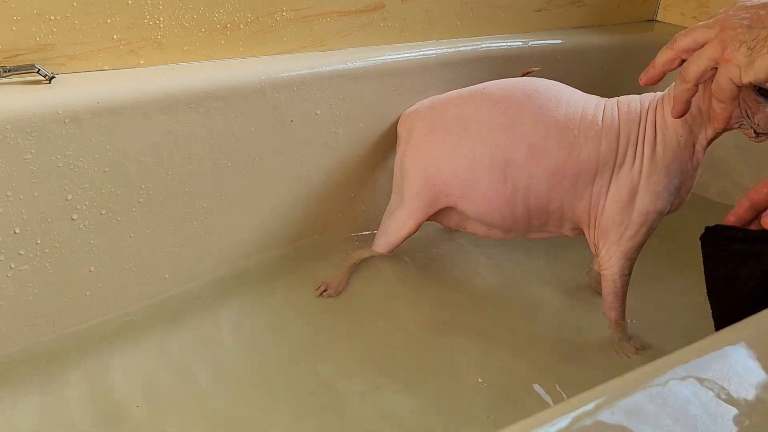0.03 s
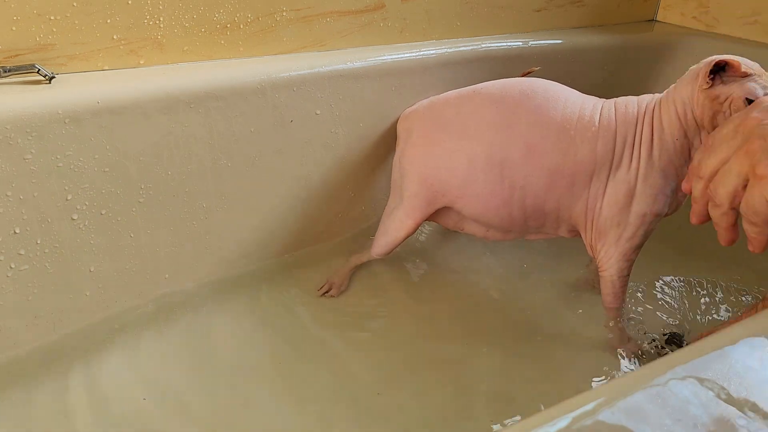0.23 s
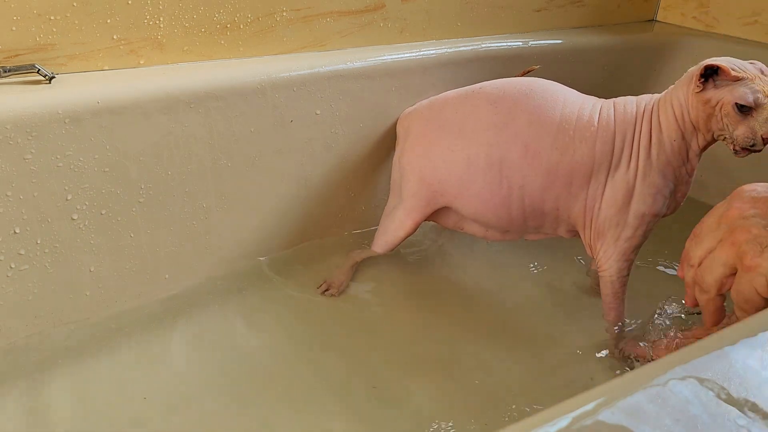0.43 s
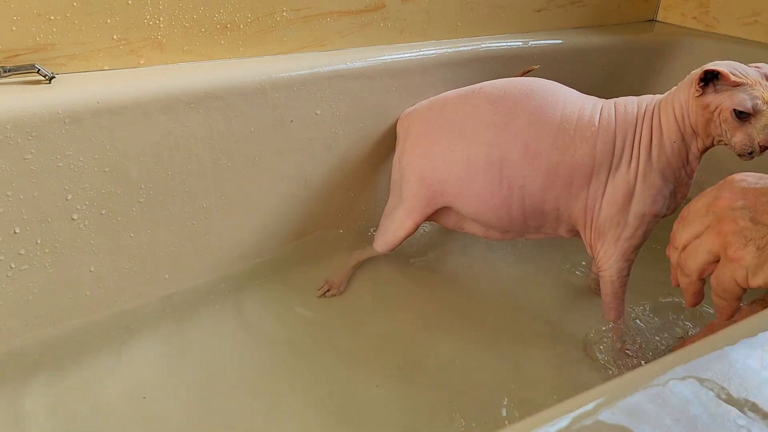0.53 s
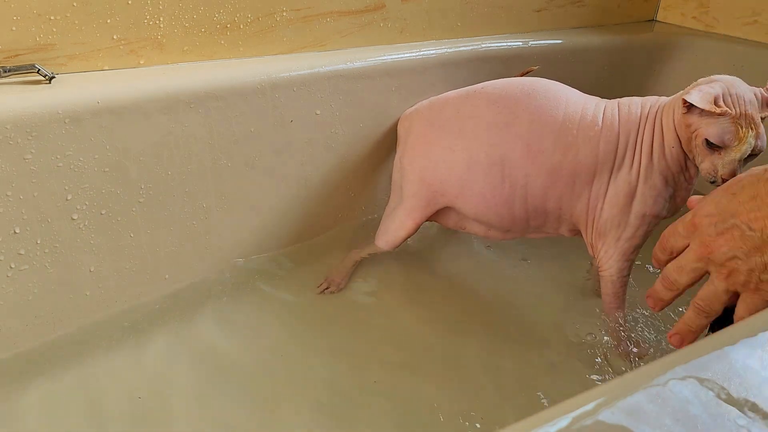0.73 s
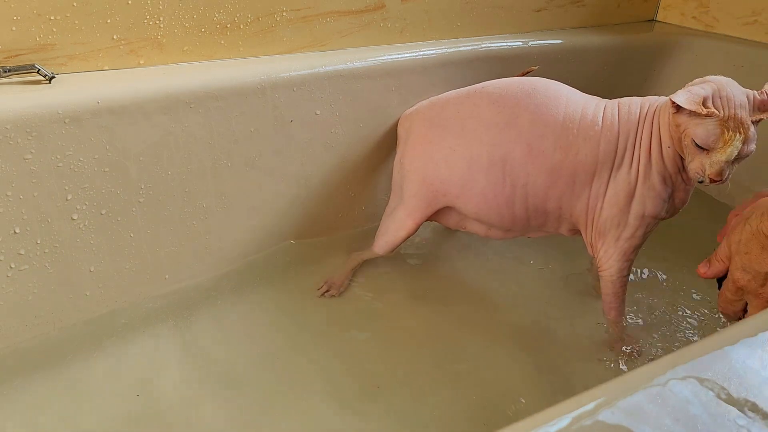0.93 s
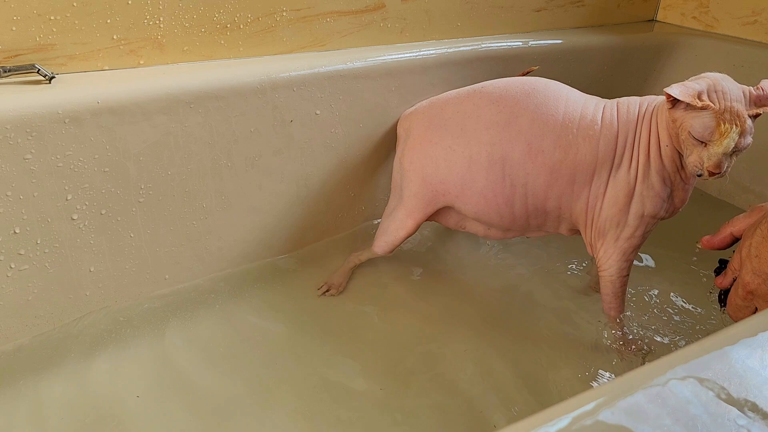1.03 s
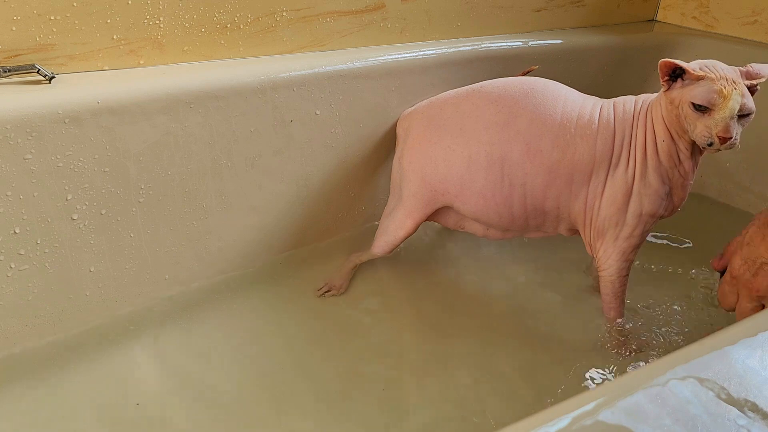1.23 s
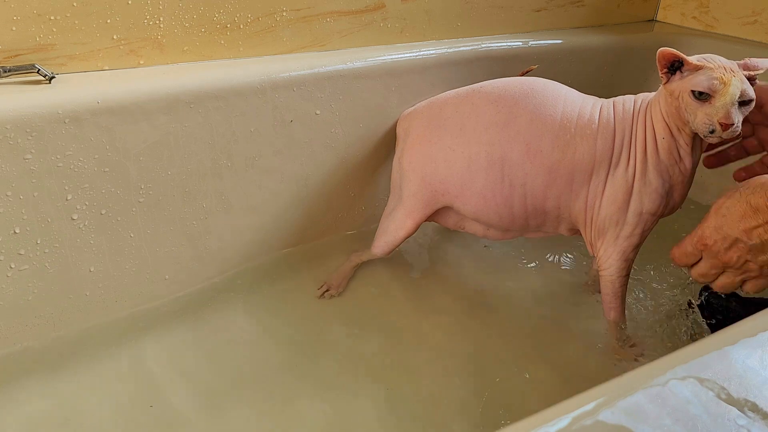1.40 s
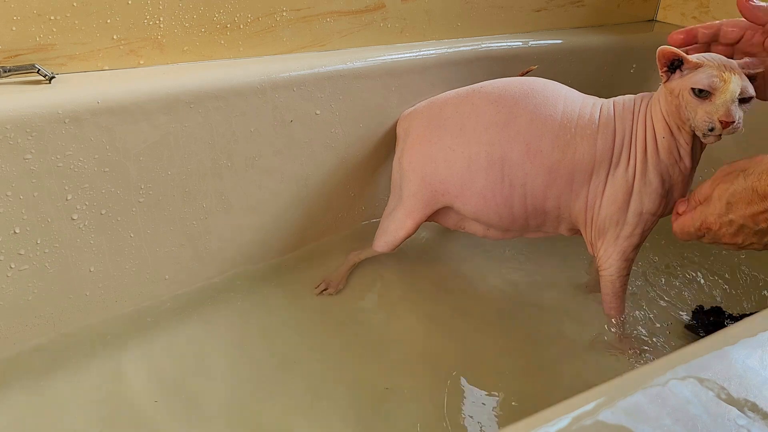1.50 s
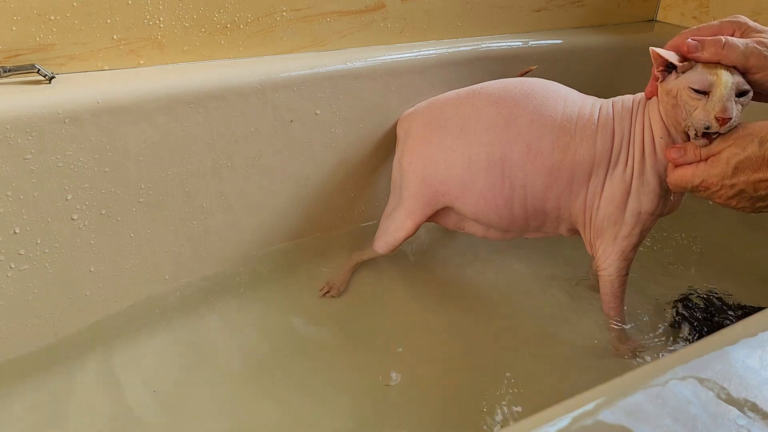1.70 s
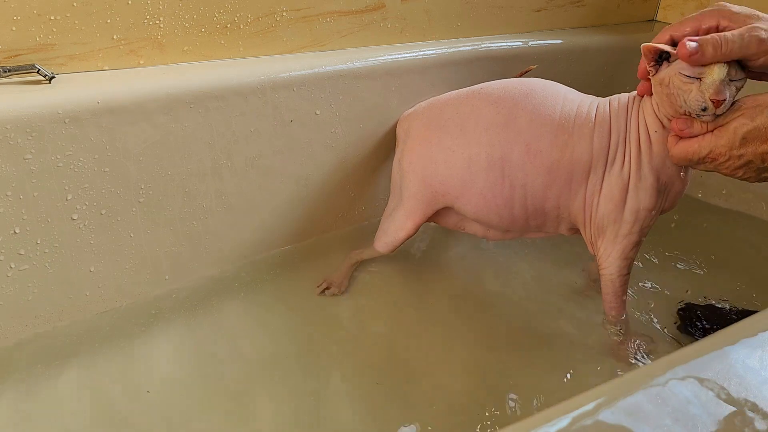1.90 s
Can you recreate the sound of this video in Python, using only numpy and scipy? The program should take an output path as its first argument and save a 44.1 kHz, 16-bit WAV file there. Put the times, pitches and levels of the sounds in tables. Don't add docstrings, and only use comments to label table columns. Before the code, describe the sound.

Shallow water sloshes in a bathtub, beginning with light splashes, growing into bubbly plops and a low gurgle, then sharper splashes before settling. Close stereo microphone in a small reverberant bathroom, faint low room rumble beneath.

```python
import sys
import numpy as np
from scipy import signal
from scipy.fft import rfft, irfft
from scipy.io import wavfile

SR = 44100
rng = np.random.default_rng(int(sys.argv[2]) if len(sys.argv) > 2 else 0)


def volts_from_decibels(level):
    exponent = np.asarray(level, float) / 20
    return 10 ** exponent


def to_wav(s):
    ch = np.atleast_2d(s).T
    pcm = np.round(np.clip(ch, -1, 1) * 32767)
    wavfile.write(sys.argv[1], SR, pcm.astype(np.int16))


N = 85995

# f/Hz, level/dB per Hz
HOUSE_NOISE = [(42, -4.5), (120, -8), (200, -28), (400, -22), (1000, -41), (2200, -28), (5000, -35),
               (16000, -49)]
# t/s, level/dB, f/Hz
TUB_HUM = [(.05, -66, 90.4), (0.107, -44.5, 93.1), (.16, -66, 85.7), (.215, -52, 131.9), (.3, -60.5, 90.4),
           (0.518, -52, 89.5), (0.621, -44.5, 146.4), (0.724, -37.5, 132.3), (0.821, -65, 104.1),
           (1.401, -70, 88.6), (1.469, -47.5, 160.4), (1.56, -71, 88.5)]
# t/s, level/dB, centre f/Hz, width/octaves, length/s
SPLASH_EVENTS = [(.003, -33, 6700, 4.8, 0.0014), (.003, -43.5, 390, 0.82, 0.012),
                 (0.104, -41, 9200, 1.05, 0.032), (0.113, -48.5, 740, 1.45, 0.031),
                 (0.2, -30, 12600, 0.73, 0.0098), (0.211, -25.5, 1140, 2.74, 0.0034),
                 (.213, -32, 890, 1.3, 0.0035), (0.364, -34, 4260, 7.8, 0.028),
                 (0.385, -34.5, 3300, 0.91, 0.011), (0.445, -36, 1280, 0.72, 0.023),
                 (0.494, -33, 1770, 0.91, 0.008), (0.423, -37, 360, 0.94, 0.045),
                 (0.501, -35, 500, 0.98, 0.039), (0.598, -33.5, 4240, 0.51, 0.01),
                 (0.658, -43.5, 716, 0.39, 0.08), (0.69, -36, 5140, 1.2, 0.011),
                 (0.945, -35.5, 7260, 2.4, 0.031), (1.003, -35.5, 11100, 3.3, 0.05),
                 (1.011, -46, 507, 0.89, 0.057), (1.22, -31, 7550, 0.52, 0.007),
                 (1.224, -28.5, 6900, 3.5, 0.024), (1.236, -28.5, 6230, 1, 0.0063),
                 (1.386, -19, 12730, 0.55, 0.011), (1.39, -22.5, 6800, 1.35, 0.0049),
                 (1.452, -24.5, 610, 0.79, 0.0057), (1.469, -25.5, 1400, 1.7, 0.0033),
                 (1.5, -40.5, 298, 0.48, 0.057)]
# t/s, level/dB, f/Hz
DROPLET_TICKS = [(.004, -55, 14300), (.323, -33.5, 13100), (.412, -38, 14500), (0.542, -31, 13200),
                 (0.568, -33, 11400), (0.774, -43, 14400), (0.549, -35, 4620), (0.794, -42, 6300),
                 (.87, -41, 5440), (.928, -40, 8700), (.932, -37, 5900), (0.942, -37, 13900),
                 (.964, -42, 6000), (0.968, -35, 7700), (0.98, -35, 7400), (1.027, -38, 5900),
                 (1.073, -32.5, 4600), (1.127, -37, 7600), (1.195, -35, 5230), (1.252, -38, 5900),
                 (1.046, -36, 7500), (1.177, -33, 13400), (1.665, -35.5, 7460), (1.66, -48, 14300),
                 (1.709, -51, 10100), (1.878, -54, 13240)]
# t/s, level/dB
AGITATION = [(0.0, -92), (0.087, -55.5), (0.292, -49.5), (0.444, -48), (0.564, -35.5), (0.754, -43),
             (0.994, -46), (1.14, -37), (1.39, -38.5), (1.475, -35), (1.852, -62.5), (1.95, -103)]
# t/s, level/dB, f/Hz, left-right level/dB
LOW_BLIPS = [(0.674, -23.5, 321, 3), (0.687, -24, 359, 5), (0.698, -25.5, 384.4, 9),
             (0.709, -21, 405, 9), (0.735, -22.5, 393, -7), (0.746, -27.5, 383, 12),
             (0.764, -30, 414, 5), (0.777, -22, 414, 12.5), (0.797, -19.5, 412, -2.5),
             (0.809, -28.5, 381, 13), (0.837, -23.5, 399, 2), (0.867, -27.5, 378, -0.5),
             (0.885, -31.5, 385, 6), (0.902, -39, 402, -2), (0.93, -46, 415, -10),
             (0.961, -40.5, 424, -1), (1.499, -27, 446, 13), (1.517, -35, 490, 1),
             (1.543, -43, 486, 0.5), (0.444, -36.5, 320, 14), (0.488, -31, 301, -2),
             (0.565, -27.5, 290, 0.5), (0.59, -32.5, 280, 6), (0.211, -37.5, 186, 3.5),
             (0.271, -46, 183, 0.5), (0.39, -41, 212, 2), (0.534, -38, 190, 0.5),
             (1.49, -32.5, 315, 4)]
# t/s, level/dB, f/Hz
BIG_BUBBLES = [
    (0.349, -34, 611),
    (0.509, -19, 441),
    (0.545, -29.5, 472),
    (0.62, -32, 408),
    (1.4501, -19.5, 484),
]
MEDIUM_BUBBLES = [(0.677, -32, 990), (1.018, -33.5, 960), (1.14, -32, 1080), (1.224, -29.5, 955),
                  (1.25, -36, 910), (1.285, -33.5, 924), (1.27, -38.5, 690), (1.335, -45, 794),
                  (1.478, -28.5, 690), (0.52, -28, 672), (0.641, -29, 1316), (1.583, -27.5, 800)]
SMALL_BUBBLES = [(0.4888, -25.5, 1248), (0.49, -24, 1510), (0.494, -24.5, 1223), (0.51, -26.5, 1307),
                 (0.524, -30.5, 1520), (0.61, -30.5, 1530), (0.6, -23, 1443), (0.875, -31.5, 1556),
                 (0.89, -48, 1590), (0.935, -31.5, 1494), (0.9559, -32.5, 1420), (1.0369, -33, 1670),
                 (1.07, -36.5, 1610)]
SMALLER_BUBBLES = [(0.462, -32.5, 1850), (0.49, -31, 2740), (0.5648, -25.5, 2296), (0.568, -20.5, 2280),
                   (0.655, -27, 1935), (0.9798, -32.5, 1930), (1.1715, -26.5, 1997), (1.18, -29, 2280),
                   (1.19, -30, 1910), (1.203, -28, 2204), (1.222, -32.5, 2030), (1.2999, -37, 2200),
                   (1.3875, -28.5, 2060), (1.397, -28, 2010), (1.407, -34, 2070), (1.415, -37, 2100),
                   (1.4534, -28.5, 2050), (1.4696, -23.5, 2157), (1.475, -23, 2284), (1.493, -42, 2080),
                   (1.757, -44, 2100), (1.774, -41, 2220), (1.797, -40, 2145), (1.83, -42, 2080),
                   (1.87, -58, 2150)]
TINY_BUBBLES = [
    (0.387, -32.5, 2596),
    (0.841, -38.5, 3160),
    (0.852, -32.5, 3550),
    (0.86, -35.5, 3180),
    (1.0241, -34.5, 3610),
    (1.0653, -27.5, 3320),
    (1.074, -30, 3550),
    (1.086, -32, 3170),
    (1.105, -34.5, 3490),
    (1.511, -37, 4430),
]
# f/Hz, level/dB
TUB_TONE = [(400, 1.5), (2100, 5.5), (2700, 4.5), (5000, 1.5), (7600, 2), (10000, -5), (12800, -1.5),
            (16000, -3.5)]
# f/Hz, side-mid level/dB
STEREO_WIDTH = [(60, -31), (150, -6.5), (380, -5), (950, 0), (2380, 1.5), (5980, -0.5), (15000, -17)]
# f/Hz, left-right level/dB
LEFT_LEVEL = [(240, 0.5), (950, 1), (3770, -1.5), (15000, 3)]
# f/Hz, left lead/radians
LEFT_LEAD = [(150, 0.11), (1500, 1.85), (7000, 1), (14000, 0.77)]
# f/Hz, fade/s
ROOM_FADE = [(150, 1), (400, 0.98), (1000, 0.68), (2200, .95), (5000, 0.95), (12000, 0.61)]


def evened(x):
    return x / np.sqrt(np.mean(x ** 2) + 1e-20)


def read(points, hz):
    f, value = np.transpose(points)
    return np.interp(np.log(hz + 1), np.log(f + 1), value)


def add(mix, s, sound):
    part = mix[..., round(s * SR):][..., :sound.shape[-1]]
    part += sound[..., :part.shape[-1]]


def coloured(x, law):
    size = x.shape[-1]
    return irfft(rfft(x) * volts_from_decibels(law(np.fft.rfftfreq(size, 1 / SR) + 1)), size)


def spread(pair, fall):
    hz, t, z = signal.stft(pair, SR, nperseg=512)
    z = z * volts_from_decibels(fall(t, hz[:, None]))
    width_db = read(STEREO_WIDTH, hz)[:, None]
    mid, side = z[0], z[1] * volts_from_decibels(width_db)
    z = np.array([mid + side, mid - side]) / np.sqrt(1 + volts_from_decibels(2 * width_db))
    z = z * volts_from_decibels(np.array([0.5, -0.5])[:, None] * read(LEFT_LEVEL, hz))[..., None]
    return signal.istft(z, SR, nperseg=512)[1]


def bubble(db, hz, cycles, glide):
    u = np.arange(0, 2.8 * cycles, hz / SR)
    rise = np.sin(np.pi / 2 * np.minimum(u / 2, 1)) ** 2
    fade = np.exp(-3.5 * u / cycles)
    return volts_from_decibels(db) * rise * fade * np.sin(2 * np.pi * u * (1 + glide * u / cycles / 2))


def swarm(per_s, low_hz, high_hz, cycles, spread_db, tilt_db):
    out = np.zeros(N)
    when, size, pitch, ring = rng.random((8000, 4)).T
    t = np.cumsum(-np.log(when + 1e-9)) / per_s
    hz = low_hz * (high_hz / low_hz) ** pitch
    db = spread_db * np.minimum(-np.log(size + 1e-9), 5) + tilt_db * np.log2(hz / 3000)
    for k in np.flatnonzero(t < N / SR):
        add(out, t[k], bubble(db[k], hz[k], cycles * (0.5 + ring[k]), 0.26))
    return evened(out)


def stirred(x):
    s, db = np.transpose(AGITATION)
    return volts_from_decibels(np.interp(np.arange(N) / SR, s, db)) * x


def house():
    noise = rng.standard_normal((2, N + 512))
    rumble = spread(noise, lambda t, hz: read(HOUSE_NOISE, hz) + 0 * t)[:, :N]
    return volts_from_decibels(-52.5) * evened(rumble)


def tub():
    s, db, hz = np.transpose(TUB_HUM)
    t = np.arange(N) / SR
    r = np.exp(-np.pi * 30 / SR)
    moving_mode = (np.interp(t, s, hz), 0)
    fixed_mode = (np.full(N, 112), -3)
    hum = 0
    for pitch, lift_db in (moving_mode, fixed_mode):
        noise = rng.standard_normal(N) + 1j * rng.standard_normal(N)
        wander = signal.lfilter([1], np.convolve([1, -r], [1, -r]), noise)
        tone = np.exp(2j * np.pi * np.cumsum(pitch) / SR)
        hum = hum + volts_from_decibels(lift_db) * evened((tone * wander).real)
    return volts_from_decibels(np.interp(t, s, db)) * hum


def splashes():
    out, t = np.zeros(N), np.arange(8192) / SR
    for s, db, centre_hz, width, length in SPLASH_EVENTS:
        hiss = rng.standard_normal(len(t))
        drop_db = 2.5 * np.minimum(rng.exponential(1, len(t)), 4)
        grit = hiss * volts_from_decibels(drop_db)
        spray = coloured(grit, lambda hz: -6 * (np.log2(hz / centre_hz) / width) ** 2)
        shape = np.minimum(t / (0.35 * abs(length)), 1) * np.exp(-t / abs(length))
        add(out, s, volts_from_decibels(db + 2.5) * shape * evened(spray))
    return out


def ticks():
    crackle = swarm(110, 4000, 15500, cycles=5, spread_db=3.5, tilt_db=1.5)
    out = stirred(volts_from_decibels(-16) * crackle)
    t, peak_s = np.arange(600) / SR, 0.0009
    shape = (t / peak_s) * np.exp(1 - t / peak_s)
    for s, db, hz in DROPLET_TICKS:
        add(out, s, volts_from_decibels(db - 2.5) * shape * np.sin(2 * np.pi * hz * t))
    return out


def churn():
    plinks = swarm(400, 900, 5000, cycles=11, spread_db=2.8, tilt_db=-1.5)
    fizz = swarm(1500, 1930, 16100, cycles=2.8, spread_db=4, tilt_db=4.5)
    return stirred(volts_from_decibels(-7) * plinks + volts_from_decibels(-6.5) * fizz)


def gurgles():
    out, t = np.zeros((2, N)), np.arange(0, 0.09, 1 / SR)
    peak_s, rise_per_s = 0.0072, 0.72
    shape = (t / peak_s) ** 2 * np.exp(2 - 2 * t / peak_s)
    for s, db, hz, pan in LOW_BLIPS:
        blip = shape * np.sin(2 * np.pi * hz * t * (1 + rise_per_s * t))
        side_db = np.array([[pan / 2], [-pan / 2]])
        add(out, s - 0.004, volts_from_decibels(db - 3.5 + side_db) * blip)
    long_ring = bubble(-36.5, 745, cycles=70, glide=-0.07)
    add(out, 1.392, long_ring[None])
    return out


def bubbles():
    out, glide = np.zeros(N), 0.084
    for s, db, hz in BIG_BUBBLES + MEDIUM_BUBBLES + SMALL_BUBBLES + SMALLER_BUBBLES + TINY_BUBBLES:
        cycles = 16.3 * (hz / 1000) ** 0.55
        add(out, s, bubble(db + 5, hz * (1 - glide / 4), cycles, glide))
    return out


def through_shallow_water(x):
    return coloured(x, lambda hz: read(TUB_TONE, hz) - 10 * np.log10(1 + (290 / hz) ** 10))


def direct(x):
    hz, side = np.fft.rfftfreq(N, 1 / SR), np.array([[0.5], [-0.5]])
    level = volts_from_decibels(side * read(LEFT_LEVEL, hz))
    lead = np.exp(1j * side * read(LEFT_LEAD, hz))
    return irfft(rfft(x) * level * lead, N)


def bathroom(x):
    def fall(u, hz):
        return -60 * u / read(ROOM_FADE, hz) + 6.6 * np.exp(-u / 0.064)

    out, t = np.zeros((2, N)), np.arange(N) / SR
    for k in range(3):
        taps = np.zeros((2, SR))
        at = np.arange(200, SR - 20, 20) + rng.integers(0, 20, (2, (SR - 201) // 20))
        np.put_along_axis(taps, at, rng.choice([-1.0, 1.0], at.shape), 1)
        tail = spread(taps, fall)
        turn = np.sqrt(2 / 3) * np.cos(2 * np.pi * (5.3 * t + k / 3))
        out += signal.fftconvolve((x * turn)[None], tail / np.linalg.norm(tail[0]), axes=1)[:, :N]
    return out


def scene():
    spray = through_shallow_water(splashes() + churn())
    drops, blips = ticks(), gurgles()
    rings = through_shallow_water(bubbles())
    near = direct(volts_from_decibels(-5) * (rings + spray) + drops) + blips
    sent = spray + volts_from_decibels(-5) * rings + volts_from_decibels(-7) * drops + volts_from_decibels(-7) * blips.mean(0)
    return near + volts_from_decibels(-0.5) * bathroom(sent) + tub() + house()


def top_cut(x):
    return signal.sosfilt(signal.butter(12, 16800, fs=SR, output="sos"), x)


def record(dry):
    low_cut = signal.butter(7, 37, "high", fs=SR, output="sos")
    treble_cut = signal.firwin(511, 15900, window=("kaiser", 9), fs=SR)
    mix = signal.oaconvolve(signal.sosfilt(low_cut, dry), treble_cut[None], "same")
    return top_cut(mix)


dry = scene()
out = record(dry)
to_wav(out)
```